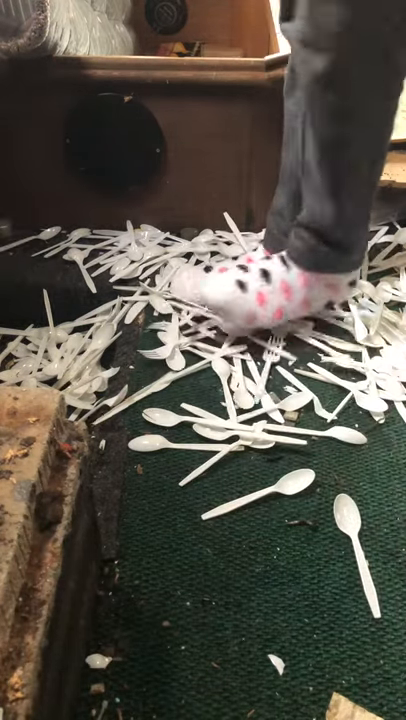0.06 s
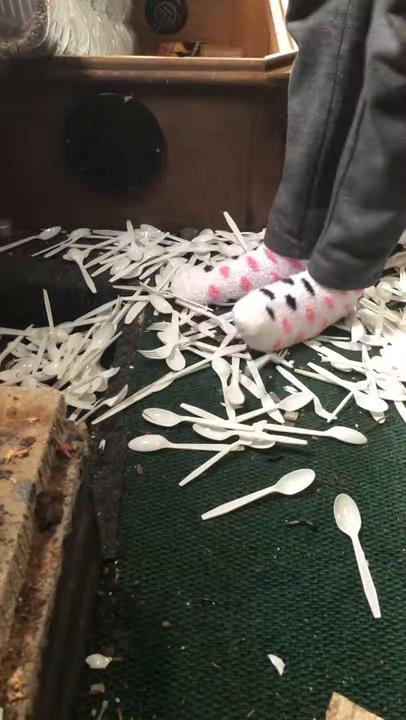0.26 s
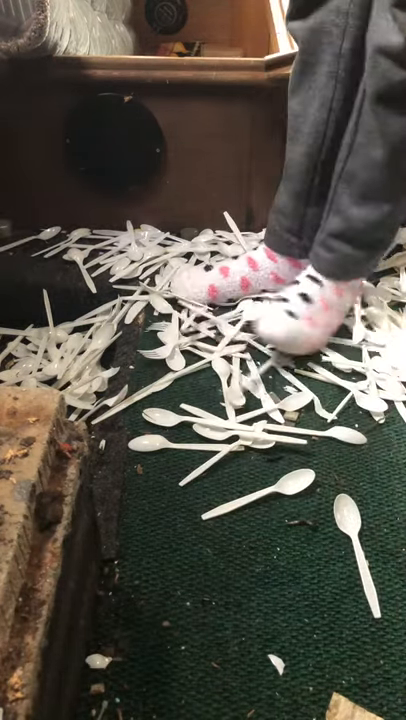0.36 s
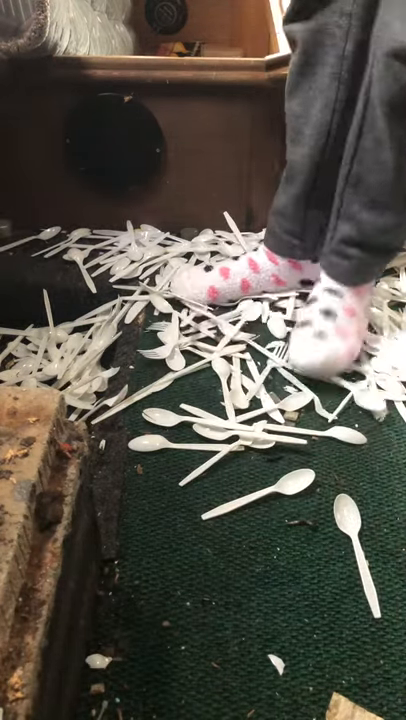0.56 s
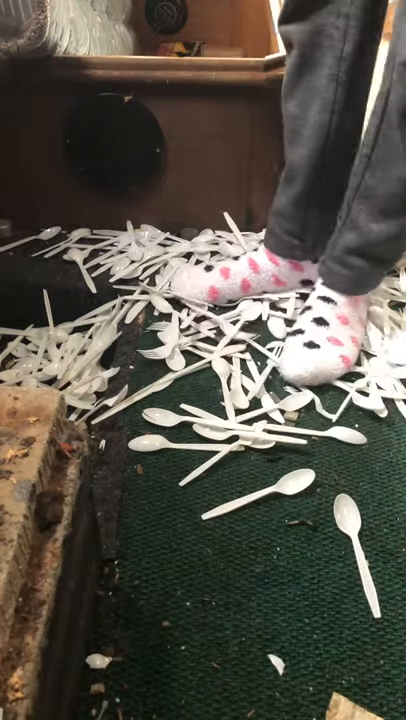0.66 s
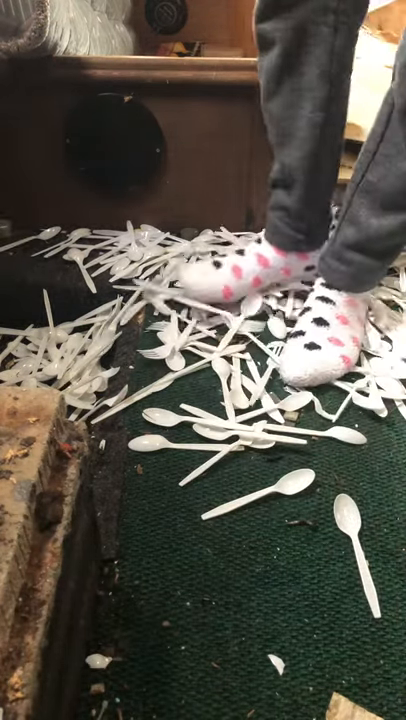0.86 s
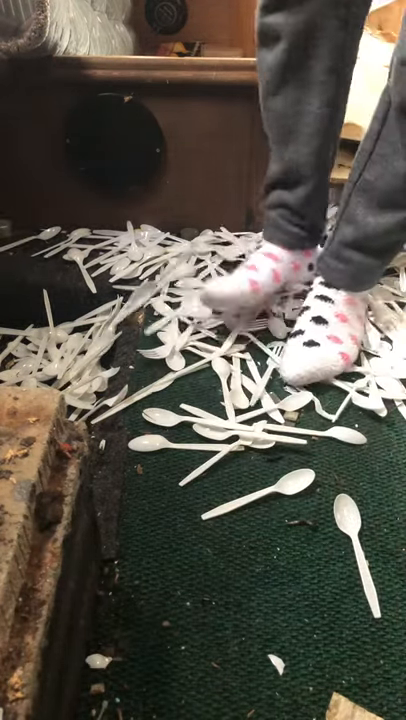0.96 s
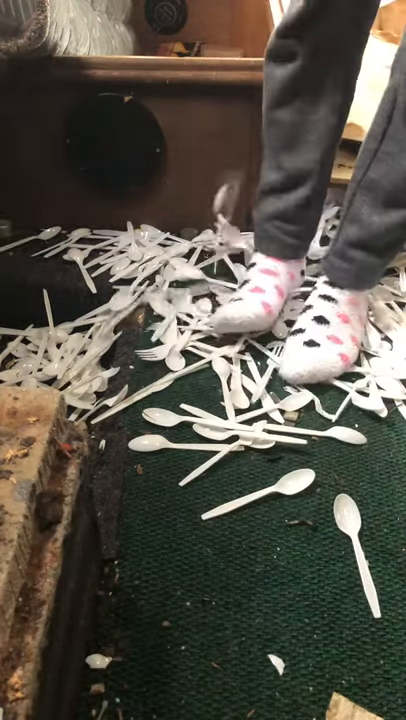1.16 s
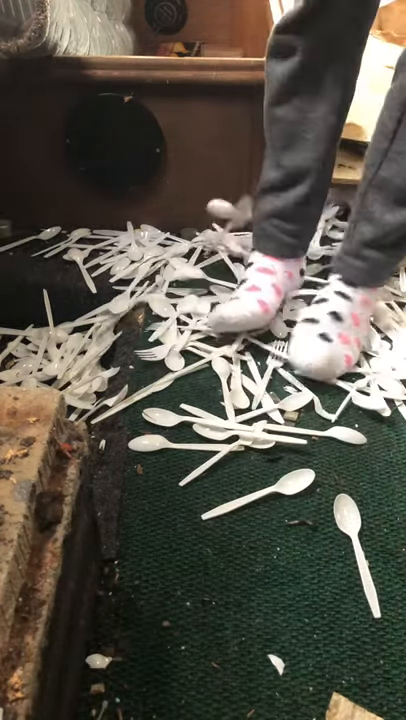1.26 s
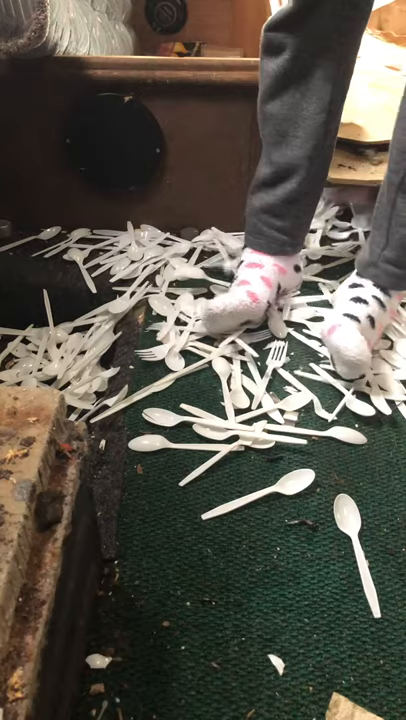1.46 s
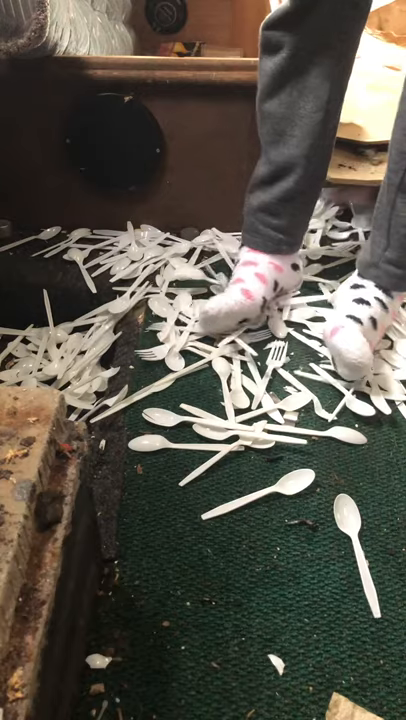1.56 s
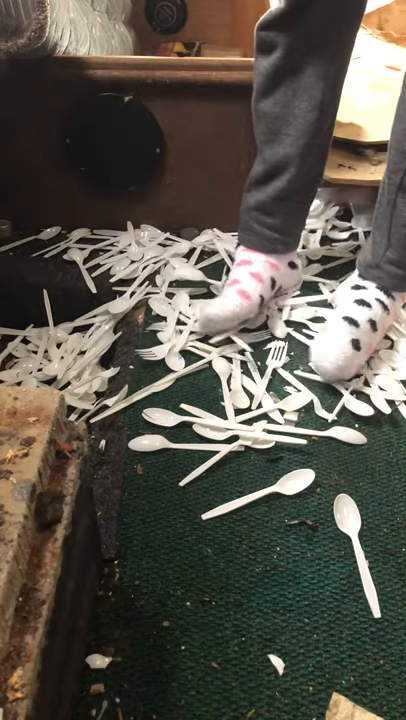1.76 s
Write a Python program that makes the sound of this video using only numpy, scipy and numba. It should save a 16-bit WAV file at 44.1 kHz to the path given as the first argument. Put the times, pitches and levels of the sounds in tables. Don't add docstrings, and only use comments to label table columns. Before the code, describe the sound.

A heap of thin plastic spoons and forks cracks and rattles underfoot, with muffled heel knocks on carpeted boards, growing loudest past the middle before dying to a few snaps over faint room hum, recorded close.

```python
import sys
import numpy as np
from scipy import signal
from scipy.fft import rfft, irfft
from scipy.io import wavfile
from scipy.ndimage import uniform_filter1d
from numba import njit

SR = 44100
rng = np.random.default_rng(int(sys.argv[2]) if len(sys.argv) > 2 else 0)


def generate_wav(sig):
    pcm = np.round(np.clip(np.atleast_2d(sig).T, -1, 1) * 32767).astype(np.int16)
    wavfile.write(sys.argv[1], SR, pcm)


def makeup_ratio(level_db):
    decades = np.asarray(level_db, float) / 20
    return 10 ** decades


N = 79380
TOP_HZ = 15800


def along(table, hz):
    table = np.array(table)
    return np.interp(np.log(hz), np.log(table[:, 0]), table[:, 1])


def level_curve(points):
    t_s, db = np.array(points)[:, :2].T
    return makeup_ratio(np.interp(np.arange(N) / SR, t_s, db))


def add(out, s, x):
    i = int(s * SR)
    out[i:i + len(x)] += x[:len(out) - i]


@njit
def rings(n, at, hz, t60, size, sr):
    out = np.zeros(n)
    for g in range(len(at)):
        turn = np.exp(complex(-np.log(1000.) / (t60[g] * sr), 2 * np.pi * hz[g] / sr))
        z = complex(size[g], 0.)
        for i in range(int(at[g]), min(n, int(at[g] + t60[g] * sr * .8))):
            out[i] += z.imag
            z *= turn
    return out


# [f/Hz, level/dB per Hz]
HUM_SPECTRUM = [(18, -32), (30, 9), (193, 8.5), (318, -11), (650, -19.5), (1090, 0), (4200, -9.5),
                (15800, -35)]
HUM_DB = -57.5


def hum():
    hz = np.maximum(np.arange(N // 2 + 1) * SR / N, 10)
    x = irfft(rfft(rng.standard_normal(N)) * makeup_ratio(along(HUM_SPECTRUM, hz)), N)
    sway = np.repeat(rng.standard_normal(N // 2000 + 1), 2000)
    sway = uniform_filter1d(sway, size=2000)[:N]
    return x / x.std() * makeup_ratio(HUM_DB + 2.4 * sway)


# [t/s, level/dB]
SCUFF_LEVEL = [
    (0, -74.5),
    (.16, -51),
    (.4, -57.5),
    (.55, -65),
    (.7, -61.5),
    (.86, -52),
    (.98, -63.5),
    (1.2, -55.5),
    (1.45, -60.5),
    (1.65, -70),
]


def scuff(count=500):
    when, pitch, side = rng.random((3, count))
    tick_size = makeup_ratio(0.5 * rng.exponential(size=count)) * np.sign(side - .5)
    x = rings(N, when * N, 260 * 3.33 ** pitch, np.full(count, 0.015), tick_size, 1. * SR)
    x = signal.lfilter(*signal.butter(2, [230, 1000], "bandpass", fs=SR), x)
    return x / x.std() * level_curve(SCUFF_LEVEL)


# [f/Hz, level/dB, t60/s]
BOARD_MODES = [(114, -14, 0.18), (169.5, -19.5, 0.26), (196.6, 2, 0.1), (242, -16.5, 0.11),
               (428, -3, 0.061)]
# [t/s, level/dB]
WEIGHT_LEVEL = [(0.0, -68.5), (0.324, -46.5), (0.456, -71), (0.496, -39.5), (0.566, -59), (0.676, -38),
                (0.726, -62), (0.832, -50), (0.986, -64.5), (1.132, -37.5), (1.202, -55.5), (1.288, -47),
                (1.318, -38), (1.448, -58), (1.568, -54.5), (1.614, -55), (1.698, -51.5), (1.8, -63)]


def boards():
    f, mode_db, t60 = np.array(BOARD_MODES, float).T
    modes = rings(SR // 5, 0 * f, f, t60, makeup_ratio(mode_db), 1. * SR)
    x = signal.fftconvolve(rng.standard_normal(N), modes)[:N]
    x = signal.lfilter(*signal.butter(4, 85, "highpass", fs=SR), x)
    x = x / np.sqrt(uniform_filter1d(x ** 2, size=1100))
    return x * level_curve(WEIGHT_LEVEL) * makeup_ratio(-6.0)


# [f/Hz, level/dB]
CUTLERY_MODES = [(2050, -17), (2620, -11.5), (3930, -5), (4970, -6), (5920, -0.5), (7500, -1), (8420, 1),
                 (11200, -2.5), (11800, 1), (12450, -2), (13100, 3), (14300, -1), (15300, 3)]
# [f/Hz, level/dB per Hz]
CRACK_SPECTRUM = [(700, -15.5), (1500, -23), (2000, -15.5), (3200, -11), (4400, -5.5), (6000, -4),
                  (9800, -4), (15800, -5.5)]
RING_T60_S, RING_TILT, RING_DB, LEAD_DB = .021, 0.13, -6, 6.0
RING_SCATTER_DB, DETUNE, CRACK_CYCLES, PIVOT_HZ = 3.5, .009, 24.0, 6000


def clicks(n, at, db, tilt_db, piece, lead_hz=None, count=10):
    f, mode_db = np.array(CUTLERY_MODES, float).T
    pick, life = rng.random((2, len(at), count))
    v = rng.standard_normal((len(at), len(f)))
    ring_hz = f * (1 + DETUNE * piece[0])
    ring_db = mode_db + RING_SCATTER_DB * piece[1] + RING_DB
    if lead_hz:
        near = np.argmin(abs(f - lead_hz))
        ring_hz[near], ring_db[near] = lead_hz, RING_DB + LEAD_DB
    ring_hz = np.clip(ring_hz * (1 + DETUNE * v), 100, TOP_HZ)
    ring_t60 = RING_T60_S * (PIVOT_HZ / f) ** RING_TILT * np.exp(0.5 * v[:, ::-1])

    shards = (np.arange(len(at)) + rng.random(len(at))) / len(at)
    bit_hz = 700 + (TOP_HZ - 700) * shards[(pick * len(at)).astype(int)]
    bit_t60 = CRACK_CYCLES * (.5 + life) / np.sqrt(bit_hz * PIVOT_HZ)

    hz = np.hstack([ring_hz, bit_hz])
    t60 = np.hstack([ring_t60, bit_t60])
    gain_db = np.hstack([ring_db + 3.0 * v[::-1], along(CRACK_SPECTRUM, bit_hz) + 9.0])
    gain_db = gain_db + db[:, None] + np.reshape(tilt_db, (-1, 1)) * np.log2(hz / PIVOT_HZ)
    size = makeup_ratio(gain_db) * rng.choice([-1., 1.], size=hz.shape)
    start = at[:, None] + 0 * hz
    return rings(n, start.ravel(), hz.ravel(), t60.ravel(), size.ravel(), 1. * SR)


# [t/s, level/dB, brightness/dB per octave]
HEAP_SLIDE = [(0, -42, -1.5), (.11, -57.5, -9), (.19, -45.5, -6), (.25, -43.5, -4.5), (.36, -34.5, -4),
              (.44, -40.5, -3.5), (0.561, -52, -8), (0.631, -35, -5), (0.742, -47.5, -5.5),
              (0.831, -32.5, -3.5), (1.0, -35, -2), (1.1, -29, -3.5), (1.19, -37, -4), (1.35, -32.5, -4),
              (1.501, -42, -6), (1.6, -49, -8.5), (1.7, -62, -6.5), (1.8, -47, -9)]


def heap(count=230, size=12):
    t_s, _, tilt_db = np.array(HEAP_SLIDE).T

    def each(v):
        return np.repeat(v, size, axis=0)

    clump_s = (np.arange(count) + rng.random(count)) / count * N / SR
    at_s = each(clump_s) + .007 * rng.exponential(size=count * size)
    size_db = each(0.68 * rng.exponential(size=count)) + 0.29 * rng.exponential(size=count * size)
    piece = [each(v) for v in rng.standard_normal((2, count, len(CUTLERY_MODES)))]
    x = clicks(N, at_s * SR, size_db, np.interp(at_s, t_s, tilt_db), piece)
    x = x / np.sqrt(uniform_filter1d(x ** 2, size=8000))
    return x * level_curve(HEAP_SLIDE)


# [t/s, peak/dB, loudest ring f/Hz, length/s, treble/dB]
CRUNCHES = [(0.019, -35, 3670, 0.013, -23), (0.0506, -32, 8060, 0.007, -16),
            (0.277, -19.5, 5800, 0.0084, -14.5), (0.3673, -18, 5850, 0.013, -12.5),
            (0.6048, -17, 8670, 0.0081, -13.5), (0.646, -28, 3720, 0.0093, -21),
            (0.822, -13.5, 4980, 0.018, -13), (0.8503, -15.5, 5850, 0.0094, -18),
            (0.9306, -19, 3820, 0.0089, -7), (0.973, -16, 8630, 0.0074, -13), (1.081, -26, 5630, 0.012, -9),
            (1.097, -16, 8550, 0.011, -10), (1.136, -20.5, 12700, 0.011, -7), (1.21, -19, 10600, 0.01, -16),
            (1.249, -19, 8000, 0.006, -15), (1.266, -20.5, 5200, 0.0098, -7),
            (1.294, -27, 11200, 0.0052, -1), (1.3285, -8.5, 11500, 0.008, -10),
            (1.3624, -16, 8000, 0.0075, -17.5), (1.4303, -16.5, 12400, 0.0079, -8),
            (1.4415, -17.5, 5960, 0.011, -14.5), (1.749, -46, 3460, 0.011, -5)]
# [t/s, peak/dB, loudest ring f/Hz, length/s, treble/dB]
FIRST_STEPS = [(0.078, -32, 2023, 0.0076, -22.5), (0.134, -29, 3560, 0.0089, -13),
               (0.162, -28.5, 6200, 0.0059, -18), (0.199, -17.5, 7450, 0.014, -14.5),
               (0.2195, -19.5, 3970, 0.008, -10.5), (0.3207, -16.5, 6370, 0.0078, -15.5),
               (0.3925, -11, 7800, 0.0092, -12), (0.4623, -31, 3690, 0.003, -29),
               (0.4763, -17, 6160, 0.0098, -19.5), (0.5711, -33, 4570, 0.0071, -6),
               (0.5838, -12.5, 13100, 0.01, -16), (0.614, -17.5, 8710, 0.0076, -14),
               (0.632, -17.5, 3500, 0.007, -14), (0.619, -18, 12500, 0.0049, -5),
               (0.6564, -16.5, 8700, 0.004, -16), (0.666, -24, 12100, 0.004, -9),
               (0.6764, -14.5, 8700, 0.006, -15), (0.7392, -36.5, 12600, 0.0044, -4),
               (0.7552, -18.5, 6500, 0.0055, -12.5), (0.776, -28, 5700, 0.0055, -15)]
STAMP_AND_DRAG = [(0.8066, -5.5, 7200, 0.0043, -11), (0.8095, -4, 12470, 0.008, -8),
                  (0.853, -12, 15300, 0.006, -11), (0.8914, -26, 4030, 0.01, -19),
                  (0.9472, -12.5, 6350, 0.005, -9), (1.0276, -10, 12000, 0.0044, -2),
                  (1.033, -20, 5550, 0.0032, -5), (1.063, -13.5, 12300, 0.01, -12),
                  (1.0865, -15, 13100, 0.0067, -8), (1.1268, -12, 7490, 0.0051, -17),
                  (1.172, -21.5, 4020, 0.0059, -15.5), (1.186, -21, 2960, 0.004, -17),
                  (1.2251, -9.5, 12940, 0.012, -11), (1.3104, -14.5, 3890, 0.0091, -10),
                  (1.3234, -6, 7640, 0.006, -13.5), (1.4187, -16, 5570, 0.0097, 3),
                  (1.48, -26, 11500, 0.0044, -6), (1.5324, -18.5, 8780, 0.0058, -9.5),
                  (1.5527, -24, 5950, 0.009, -9.5), (1.565, -30, 5750, 0.0059, -9),
                  (1.5943, -36, 3940, 0.0074, -20), (1.63, -31, 7320, 0.0086, -17.5),
                  (1.672, -41, 2500, 0.0062, -19), (1.696, -52, 4240, 0.012, -25)]
EVEN_TREBLE_DB, TILT_PER_DB = -12, 0.72
CLICK_SPREAD_DB, FLURRY_FADE_DB, SWELL_DB, EDGE_DB = 1.6, 17.0, 13, 2


def crack_piece(hz, length_s, treble_db, crunch, count=32):
    late = (np.arange(count) + rng.random(count)) / count
    late[0] = 0
    size_db = CLICK_SPREAD_DB * rng.exponential(size=count) - FLURRY_FADE_DB * late
    if crunch:
        size_db -= SWELL_DB * np.exp(-late / 0.4)
    else:
        size_db += EDGE_DB * np.exp(-late / .025)
    at = late * 2 * np.clip(length_s, .002, .04) * SR
    piece = rng.standard_normal((2, len(CUTLERY_MODES)))
    x = clicks(SR // 8, at, size_db, TILT_PER_DB * (treble_db - EVEN_TREBLE_DB), piece, hz)
    return x / np.sqrt(uniform_filter1d(x ** 2, size=128).max() * 2)


def snaps():
    out = np.zeros(N)
    for table, crunch in (CRUNCHES, True), (FIRST_STEPS, False), (STAMP_AND_DRAG, False):
        for s, db, hz, length_s, treble_db in table:
            add(out, s, makeup_ratio(db - 7.5) * crack_piece(hz, length_s, treble_db, crunch))
    return out


# [t/s, peak/dB, boards re peak/dB, spoon-bowl knock f/Hz]
KNOCKS = [(0.078, -26, -29, 974), (0.224, -50, 0, 700), (0.319, -35, -9, 1090), (0.477, -21.5, -24.5, 780),
          (0.607, -41.5, -9.5, 715), (0.655, -19.5, -23.5, 995), (0.807, -20, -29, 667),
          (1.052, -31, -19, 780), (1.127, -27, -16, 660), (1.311, -15.5, -18, 969),
          (1.378, -26.5, -20, 660), (1.536, -30.5, -16, 1060)]
BOWL_T60_S, PUSH_S, BOARDS_DB = 0.033, 0.014, 4.5


def knocks():
    out = np.zeros(N)
    f, mode_db, t60 = np.array(BOARD_MODES, float).T
    bowl_ratio = np.array([1.038, 0.676, 1.407, 1.9, 2.5])
    bowl_db = np.array([-10.0, -18.0, -18.0, -18.5, -16.0])
    push_t = np.arange(SR // 20) / SR
    for s, db, boards_db, hz in KNOCKS:
        detune, scatter, delay = rng.standard_normal((3, 5))
        push = rng.standard_normal(len(push_t)) * np.exp(-push_t / PUSH_S)
        modes = rings(SR // 5, 0 * f, f * (1 + 0.017 * detune), t60, makeup_ratio(mode_db + 1.4 * scatter), 1. * SR)
        low = np.convolve(modes, push)
        low = low / abs(low).max() * makeup_ratio(boards_db + BOARDS_DB)
        bowl = rings(len(low), 30 * abs(delay), hz * bowl_ratio, np.full(5, BOWL_T60_S), makeup_ratio(bowl_db), 1. * SR)
        add(out, s, makeup_ratio(db) * (low + bowl))
    return signal.lfilter(*signal.butter(4, 92, "highpass", fs=SR), out)


# [t/s, length/s, ring f/Hz, level/dB]
DRAGS = [(0.148, 0.014, 3450, -62), (.163, 0.017, 5800, -42.5), (0.194, 0.016, 4490, -39),
         (0.223, 0.024, 3850, -44), (.392, 0.02, 3590, -36.5), (0.774, .015, 5680, -41.5),
         (0.813, 0.051, 4010, -35.5), (0.846, 0.036, 5480, -36), (.89, 0.012, 3940, -39),
         (0.892, 0.043, 5840, -37.5), (0.93, 0.021, 4030, -37.5), (0.997, .05, 3905, -42.5),
         (1.157, 0.043, 8670, -48.5), (1.029, 0.024, 5870, -34.5), (1.331, 0.036, 3896, -36),
         (1.422, 0.022, 5750, -36), (1.427, 0.028, 7760, -36), (1.464, 0.016, 6000, -45),
         (1.546, 0.021, 5910, -37)]
DRAG_RATE_HZ, DRAG_T60_S = 700, .016


def drags():
    out = np.zeros(N)
    for s, length_s, hz, db in DRAGS:
        gap, detune, scatter = rng.standard_normal((64, 3)).T
        at_s = np.cumsum(np.exp(.6 * gap)) / DRAG_RATE_HZ
        on = at_s < length_s
        tick_hz = hz * (1 + .014 * detune[on])
        x = rings(SR // 8, at_s[on] * SR, tick_hz, DRAG_T60_S + 0 * at_s[on], makeup_ratio(3.5 * scatter[on]), 1. * SR)
        add(out, s, x * makeup_ratio(db) / np.sqrt(np.sum(x ** 2) / (length_s * SR)))
    return out


ROOM_T60_S, ROOM_DB, ROOM_DULL_HZ = .14, -12.0, 9000


def room(near):
    t = np.arange(SR // 3) / SR
    tail = rng.standard_normal(len(t)) * makeup_ratio(-60 * t / ROOM_T60_S) * np.clip(t / 0.0065 - .5, 0, 1)
    tail = signal.lfilter(*signal.butter(1, ROOM_DULL_HZ, fs=SR), tail)
    wet = signal.fftconvolve(near, tail / np.sqrt(np.sum(tail ** 2)))[:N]
    return makeup_ratio(ROOM_DB) * wet


def scene():
    plastic = heap() + snaps() + drags()
    thin = signal.butter(2, 1300, "highpass", fs=SR)
    near = signal.lfilter(*thin, plastic) + scuff() + boards() + knocks()
    return (near + room(near) + hum())[None]


def top_cut(x):
    return signal.sosfilt(signal.butter(12, 16990, fs=SR, output="sos"), x)


def record(dry):
    x = signal.sosfilt(signal.butter(2, 45, "highpass", fs=SR, output="sos"), dry)
    x = signal.sosfilt(signal.ellip(8, .2, 62, TOP_HZ, fs=SR, output="sos"), x)
    return top_cut(x)


dry = scene()
out = record(dry)
generate_wav(out)
```